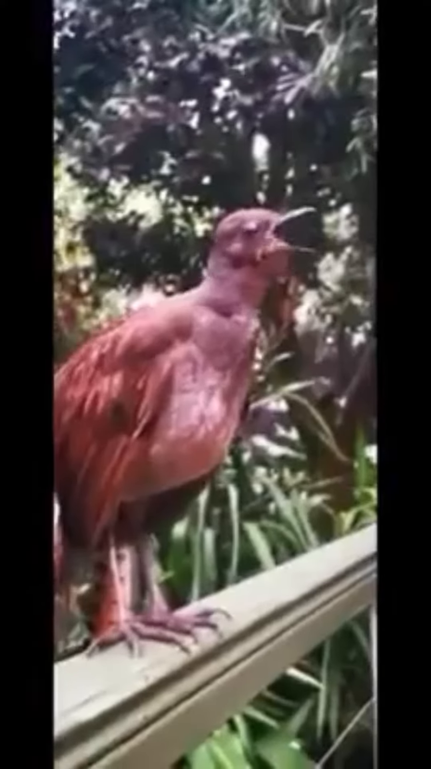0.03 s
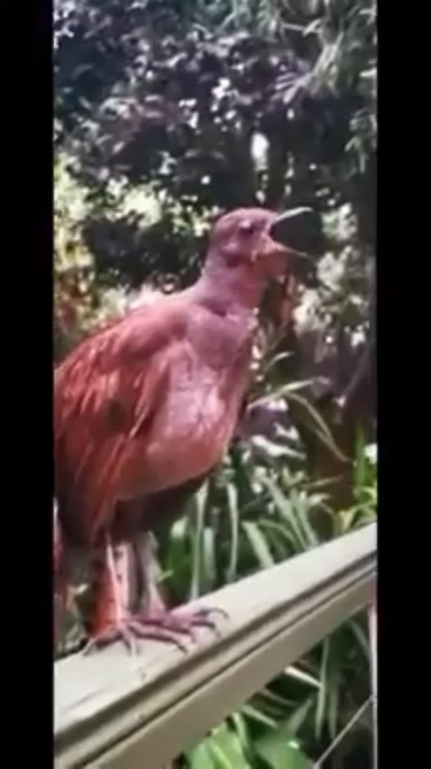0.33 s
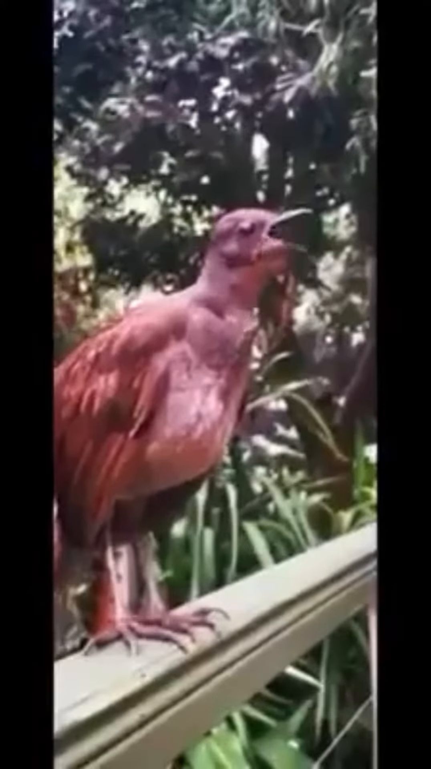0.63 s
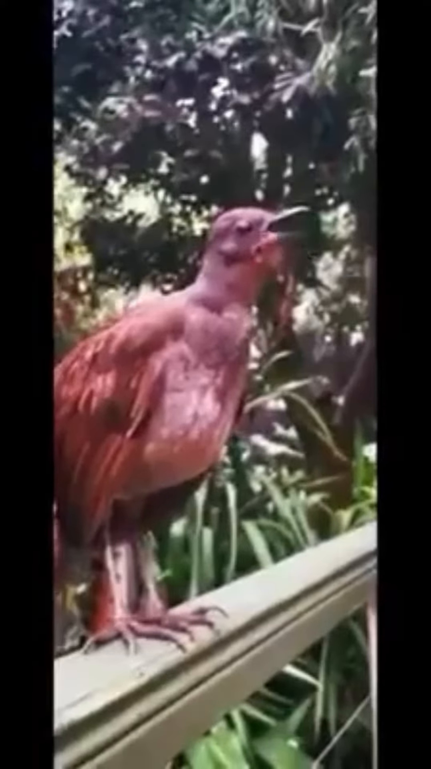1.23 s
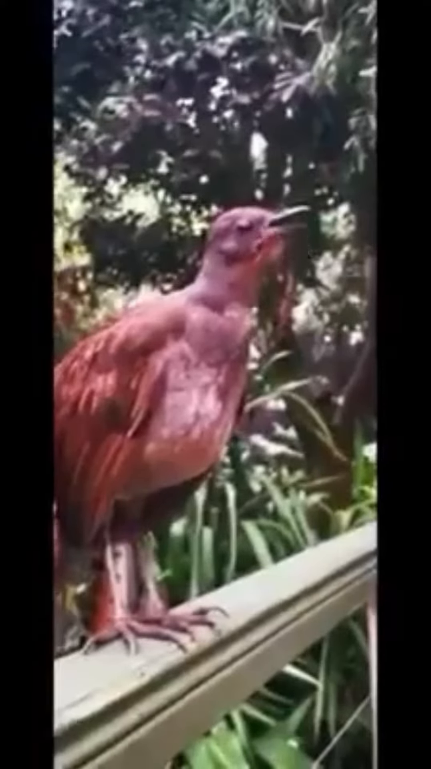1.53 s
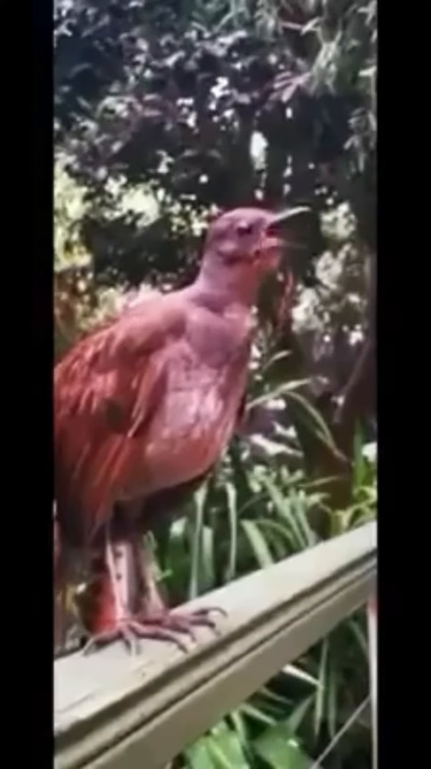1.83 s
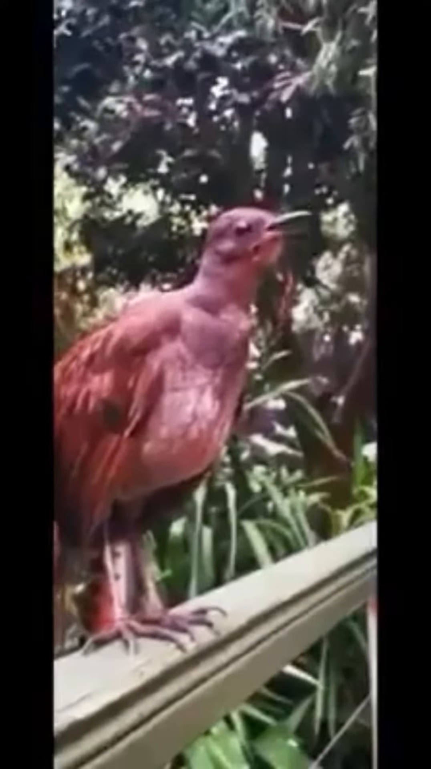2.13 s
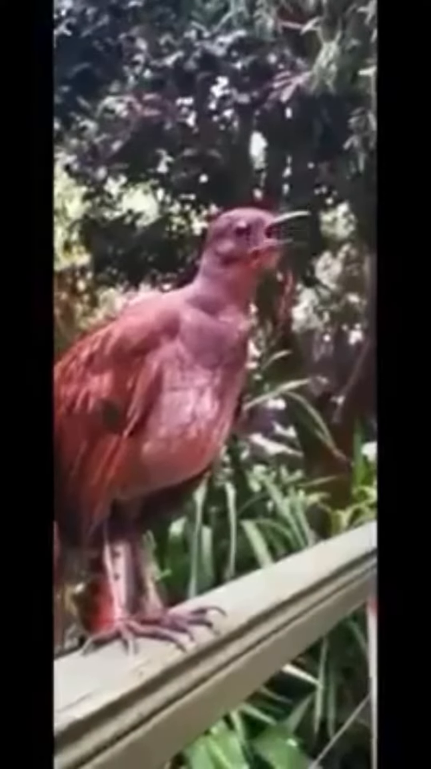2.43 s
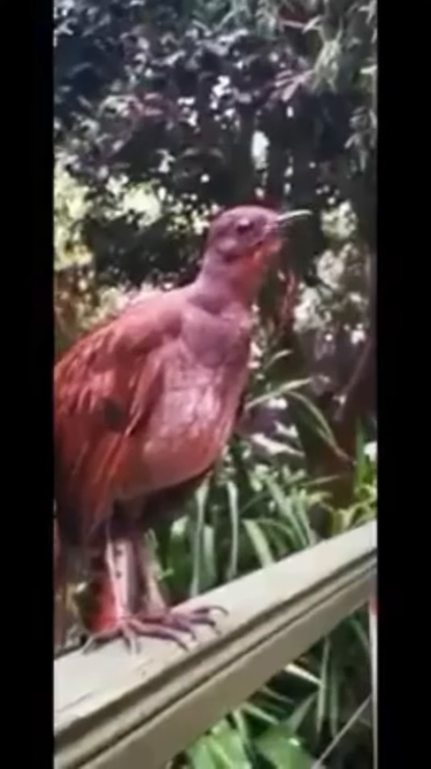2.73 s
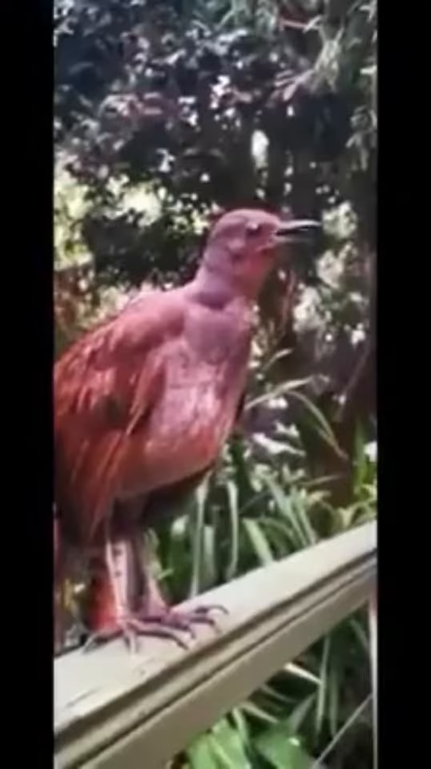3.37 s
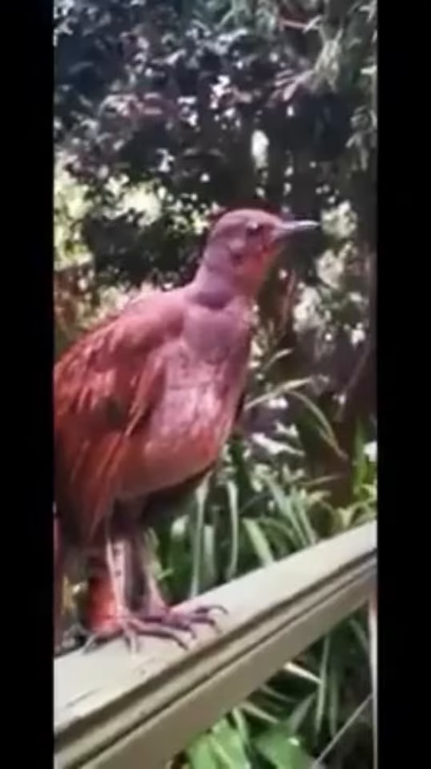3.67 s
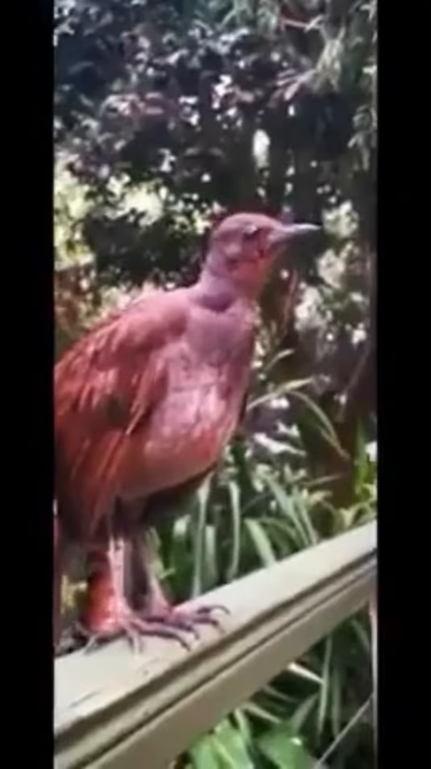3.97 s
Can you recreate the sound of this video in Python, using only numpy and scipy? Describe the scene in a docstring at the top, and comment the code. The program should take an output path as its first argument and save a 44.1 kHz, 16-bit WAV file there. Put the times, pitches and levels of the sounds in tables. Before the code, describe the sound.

A large bird close to a dull microphone gives quick, harsh cackles with small hoots and soft notes between them. From about 1.4 to 2.6 seconds it slows into seven thin whines, each breaking down into a rough squawk. From 2.8 to 3.5 seconds come short yelps, bill clicks and hisses, with one faint hiss near 4 seconds. A low garden rumble and slight echo continue throughout.

```python
"""A garden, one dull microphone close to a large bird on a railing; low rumble and a faint echo throughout.
The bird opens with harsh arched cackles sung with both sides of the syrinx, hoots and soft notes between.
From 1.4 s it slows into thin whines that break downward into rough squawks.
From 2.8 s come short yelps, bill clicks and hisses of air; one faint hiss closes the scene near 4 s.
At this distance the loudest notes overload the microphone slightly."""
import sys
import numpy as np
from scipy import signal
from scipy.fft import rfft, irfft, next_fast_len
from scipy.io import wavfile
from scipy.ndimage import uniform_filter1d, map_coordinates

SR = 44100
rng = np.random.default_rng(int(sys.argv[2]) if len(sys.argv) > 2 else 0)


def dump_mix(stems):
    """Bounce the given channels to the path in sys.argv[1] as a 16-bit WAV at rate SR."""
    frames = np.atleast_2d(stems).T  # one column per channel
    limited = np.clip(frames, -1, 1)  # hard clip at full scale
    pcm = np.round(limited * 32767).astype(np.int16)
    wavfile.write(sys.argv[1], SR, pcm)


N = 176400   # 4 s


def from_db(db):
    """Decibels to gain."""
    return 10 ** (np.asarray(db) / 20)


def unit_rms(x):
    """Scale to unit power."""
    return x / np.sqrt(np.mean(x ** 2) + 1e-20)


def clock(length_s):
    """Sample times of one note."""
    return np.arange(max(int(length_s * SR), 64)) / SR


def add(out, start_s, x):
    """Mix a sound in at its start time."""
    i = int(start_s * SR)
    x = x[max(-i, 0):max(N - i, 0)]
    out[max(i, 0):max(i, 0) + len(x)] += x


def coloured(x, colour):
    """Filter by a curve through (frequency_hz, gain_db) points."""
    size = next_fast_len(len(x) + 2048)
    hz, db = np.transpose(colour)
    bin_hz = np.maximum(np.arange(size // 2 + 1) * SR / size, 1)
    gain = from_db(np.interp(np.log(bin_hz), np.log(hz), db))
    return irfft(rfft(x, size) * gain, size)[:len(x)]


def wobble(t, rate_hz):
    """Smooth random drift of unit power."""
    pole = np.exp(-2 * np.pi * rate_hz / SR)
    noise = rng.standard_normal(len(t) + SR // 10)
    return unit_rms(signal.lfilter([1], [1, -2 * pole, pole * pole], noise)[SR // 10:])


def swell(t, attack_s, release_s):
    """Rounded attack, hold and release."""
    rise = np.sin(np.pi / 2 * np.clip(t / attack_s, 0, 1)) ** 2
    fall = np.sin(np.pi / 2 * np.clip((t[-1] - t) / release_s, 0, 1)) ** 2
    return rise * fall


def glide(t, start_hz, middle_hz, end_hz):
    """A smooth bend through three pitches."""
    return np.polyval(np.polyfit([0, .5, 1], [start_hz, middle_hz, end_hz], 2), t / t[-1])


def voice(t, pitch, colour, jitter, shimmer=.2, unsteady_hz=260, levelling=.7):
    """Unsteady syrinx pulses through the throat, their level partly evened."""
    phase = 2 * np.pi * np.cumsum(pitch * (1 + jitter * wobble(t, unsteady_hz))) / SR
    pulses = sum(np.cos(k * phase + 2 * np.pi * rng.random()) for k in range(1, 17))
    tone = unit_rms(coloured(pulses * (1 + shimmer * wobble(t, unsteady_hz)), colour))
    power = uniform_filter1d(tone * tone, size=256) + 1e-4
    return unit_rms(tone / power ** (levelling / 2))


def rasp(t, pitch, colour, chop=.6, flutter=.15, flutter_hz=170):
    """Chaotic rattle of the syrinx: air chopped each cycle, at a nearly even level."""
    gate = 1 + chop * np.cos(2 * np.pi * np.cumsum(pitch) / SR)
    gate *= np.exp(flutter * wobble(t, flutter_hz))
    return unit_rms(coloured(gate * rng.standard_normal(len(t)), colour))


# Spectrum of the garden behind the bird: frequency_hz, gain_db
GARDEN_COLOUR = [(20, 1.5), (36, -0.5), (70, -1.5), (150, -10), (320, -15.5), (600, -21), (1700, -28),
                 (3000, -33), (6500, -36.5), (9500, -49.5), (13000, -65)]
# Slow rise and fall of its rumble: time_s, relative_level_db
GARDEN_SWELL = [(0.0, -47.5), (0.27, -47.5), (2.9, -42), (3.39, -47), (4.0, -41)]


def garden(gain_db=5):
    """Low outdoor rumble all around the microphone, swelling a little, with a faint hiss above it."""
    level_db = gain_db + np.interp(np.arange(N) / SR, *np.transpose(GARDEN_SWELL))
    return from_db(level_db) * unit_rms(coloured(rng.standard_normal(N), GARDEN_COLOUR))


# Tone of the scatter that the garden sends back to the microphone: frequency_hz, gain_db
SCATTER_COLOUR = [(300, -13), (1000, 4), (1700, -4.5), (2600, 0.5), (4500, 10.5), (7000, 9.5), (10000, 3.5)]


def echoes(bird, ring_hz=1722, ring_t60_s=.3, ring_db=-15):
    """Quick scatter from near the railing, a longer wash from the foliage and one faint lingering ring."""
    t, scatter = clock(.39), 0
    onset = np.minimum(t / .0014, 1)
    for gain_db, t60_s in ((-19, .38), (-13, .19)):   # foliage, nearby scatter
        tail = rng.standard_normal(len(t)) * np.exp(-np.log(1000) * t / t60_s) * onset
        scatter = scatter + from_db(gain_db) * tail / np.linalg.norm(tail)
    fade = np.exp(-np.log(1000) * t / ring_t60_s)
    ring = from_db(ring_db) * 2 * fade / fade.sum() * np.sin(2 * np.pi * ring_hz * t)
    return signal.fftconvolve(bird, coloured(scatter, SCATTER_COLOUR) + ring)[:N]


# Ticks of the bill: start_s, level_db
BILL_CLICKS = [(2.928, -14), (2.936, -23), (2.982, -19), (3.304, -29), (3.377, -21), (3.391, -22),
               (3.433, -27), (3.442, -21)]
# Spectrum of one tick: frequency_hz, gain_db
BILL_COLOUR = [(250, -25), (700, -3.5), (1300, -6), (2200, -11), (3400, -15.5), (4500, -17.5), (9000, -36)]


def bill_clicks(decay_s=.0028):
    """Dry ticks of the bill at close range, each a burst of noise that dies at once."""
    out, t = np.zeros(N), clock(10 * decay_s)
    for start_s, level_db in BILL_CLICKS:
        burst = unit_rms(coloured(rng.standard_normal(len(t)), BILL_COLOUR))
        add(out, start_s, from_db(level_db) * burst * np.exp(-t / decay_s))
    return out


# Hisses and the glide of their whistle: start_s, length_s, air_db, whistle_db, start_hz, middle_hz, end_hz
BILL_HISSES = [(2.899, 0.11, -33.5, -34, 5060, 6330, 7120), (3.004, 0.087, -19.5, -23.5, 4500, 4680, 3670),
               (3.023, 0.076, -27.5, -20.5, 7030, 6715, 5770), (3.052, .08, -33.5, -20, 3200, 1900, 2620),
               (3.075, 0.071, -20, -19.5, 3500, 4400, 5490), (3.173, 0.097, -21, -26.5, 6810, 7000, 6200),
               (3.443, 0.077, -17, -20.5, 5360, 4510, 4120), (3.942, 0.093, -32, -34, 4200, 6120, 6920)]
# Spectrum of the rushing air: frequency_hz, gain_db
AIR_COLOUR = [(300, -41), (1200, -14), (2000, -1), (3000, -1.5), (4500, -4), (5500, -3.5), (7000, -1),
              (9500, -14.5), (13000, -46)]


def hisses(whistle_width_hz=150):
    """Air forced through the bill, with a hoarse gliding whistle in it."""
    out = np.zeros(N)
    for start_s, length_s, air_db, whistle_db, start_hz, middle_hz, end_hz in BILL_HISSES:
        t = clock(length_s)
        phase = 2 * np.pi * np.cumsum(glide(t, start_hz, middle_hz, end_hz)) / SR
        whistle = wobble(t, whistle_width_hz) * np.cos(phase)
        whistle += wobble(t, whistle_width_hz) * np.sin(phase)
        air = unit_rms(coloured(rng.standard_normal(len(t)), AIR_COLOUR))
        hiss = from_db(air_db) * air + from_db(whistle_db) * whistle
        add(out, start_s, hiss * swell(t, attack_s=.023, release_s=.036))
    return out


# Hollow hoots among the cackles: start_s, length_s, level_db, top_hz, rasp_db
HOOT_NOTES = [(0.591, 0.044, -16.5, 575.6, -24.5), (0.639, 0.027, -33.5, 521, -14.5)]
# Throat resonances in a hoot: frequency_hz, gain_db
HOOT_THROAT = [(300, -49), (560, -10.5), (850, -11.5), (1120, 2), (1600, -9), (2000, -28.5), (4000, -25.5),
               (9000, -37)]


def hoots(sag_hz=119):
    """Low arched notes with the throat tuned to their second harmonic."""
    out = np.zeros(N)
    for start_s, length_s, level_db, top_hz, rasp_db in HOOT_NOTES:
        t = clock(length_s)
        pitch = top_hz - sag_hz * (2 * t / t[-1] - 1) ** 2
        tone = from_db(level_db) * voice(t, pitch, HOOT_THROAT, jitter=.0051, shimmer=.08)
        air = from_db(rasp_db) * rasp(t, pitch, HOOT_THROAT)
        add(out, start_s, (tone + air) * swell(t, attack_s=.01, release_s=.01))
    return out


# Throat resonances in yelps, squawks and cackles: frequency_hz, gain_db
THROAT_COLOUR = [(300, -17), (560, -22.5), (780, -7.5), (1080, -12.5), (1300, -16.5), (1550, 10),
                 (1900, 9.5), (2150, 5), (2400, -4), (3200, -21.5), (3900, -14.5), (5000, -32),
                 (6900, -37.5), (9500, -34.5), (13000, -49.5)]
# Spectrum of the rasp in the same calls: frequency_hz, gain_db
RASP_COLOUR = [(250, -53.5), (450, -24.5), (600, -11.5), (1000, -14), (1400, -0.5), (1800, 0), (2400, 0.5),
               (3300, -9), (4100, -8.5), (5000, -23), (6000, -19.5), (7000, -14.5), (9500, -34.5),
               (13000, -70.5)]
# Soft notes among the cackles, then the closing yelps:
# start_s, length_s, level_db, start_hz, middle_hz, end_hz, throat_hz, rasp_db
YELP_NOTES = [(0.725, 0.067, -26, 751, 762, 710, 1810, -22), (0.84, 0.059, -31, 656, 693, 660, 1710, -22.5),
              (.95, 0.089, -35, 657, 694, 610, 1690, -23), (2.859, 0.029, -12.5, 587, 480, 333, 1480, -32),
              (2.997, 0.033, -12, 368.5, 602, 681, 1906, -17),
              (3.166, 0.038, -15.5, 407, 556.3, 665, 1800, -17),
              (3.324, 0.048, -4, 469, 639.3, 382, 1683, -20.5),
              (3.444, .025, -18, 428, 553, 805, 2050, -12.5)]


def yelps(base_throat_hz=1720, throat_follows=.75):
    """Quick glides of one voice, the throat resonance sliding along with the pitch."""
    out = np.zeros(N)
    for start_s, length_s, level_db, start_hz, middle_hz, end_hz, throat_hz, rasp_db in YELP_NOTES:
        t = clock(length_s)
        pitch = glide(t, start_hz, middle_hz, end_hz)
        throat = np.array(THROAT_COLOUR) * [throat_hz / base_throat_hz, 1]
        speed = (pitch / pitch.mean()) ** throat_follows
        speed /= speed.mean()
        tone = from_db(level_db) * voice(t, pitch / speed, throat, jitter=.016)
        air = from_db(rasp_db) * rasp(t, pitch / speed, RASP_COLOUR)
        # Reading at a changing speed bends pitch and resonances together.
        yelp = map_coordinates(tone + air, [np.cumsum(speed)], order=3)
        add(out, start_s, yelp * swell(t, attack_s=.33 * length_s, release_s=.33 * length_s))
    return out


# Whines that break into squawks:
# start_s, whine_s, squawk_s, whine_hz, squawk_hz, whine_db, squawk_db, rasp_db
SQUAWK_NOTES = [(1.399, .07, 0.064, 965, 701.4, -12.5, -10, -15),
                (1.597, 0.05, .058, 990, 625, -15, -6.5, -13.5),
                (1.765, 0.058, 0.064, 965, 629, -15, -6, -10.5),
                (1.947, 0.06, 0.061, 965, 571, -13.5, -8.5, -12.5),
                (2.131, .062, 0.063, 955, 585, -15, -6, -11),
                (2.321, 0.073, 0.06, 985, 590.6, -14.5, -7, -12),
                (2.54, 0.038, 0.066, 1000, 538, -18.5, -10.5, -38)]
# Throat resonances in a whine: frequency_hz, gain_db
WHINE_THROAT = [(300, -28.5), (600, -4), (1000, -10), (1400, -4.5), (1900, 2), (2900, -19), (3900, -21),
                (5000, -31), (6900, -28.5), (9500, -46), (13000, -60.5)]


def squawks(break_s=.03, lead_s=.01, scoop_hz=148.5, scoop_s=.012, rise_hz=43, sag_db=-3.5):
    """A thin, nearly level whine; then the pitch drops and the note turns loud and rough."""
    out = np.zeros(N)
    for start_s, whine_s, squawk_s, whine_hz, squawk_hz, whine_db, squawk_db, rasp_db in SQUAWK_NOTES:
        t = clock(whine_s + squawk_s)
        since_break = t - whine_s
        pitch = np.interp(since_break, [0, break_s, (break_s + squawk_s) / 2, squawk_s],
                          [whine_hz, squawk_hz, squawk_hz * .97, squawk_hz * .84])
        pitch += scoop_hz * np.exp(-t / scoop_s)   # the whine slides in from above
        pitch += rise_hz * (t / whine_s - .5) * (since_break < 0)
        pitch *= 1 + .015 * wobble(t, rate_hz=50)
        flutter_db = wobble(t, rate_hz=60)
        fade_db = sag_db * np.minimum(t / whine_s, 1) ** 4   # it sags just before it breaks
        whine_gain = from_db(whine_db + flutter_db + fade_db) * swell(t, .028, release_s=squawk_s)
        # The effort rises just before the pitch drops.
        squawk_gain = from_db(squawk_db) * swell(since_break + lead_s, .031 + lead_s, release_s=.021)
        rasp_gain = from_db(rasp_db) * swell(since_break, attack_s=.028, release_s=.021)
        rasp_gain += whine_gain * from_db(-11.5)   # a little rasp in the whine too
        whine = whine_gain * voice(t, pitch, WHINE_THROAT, jitter=.028)
        squawk = squawk_gain * voice(t, pitch, THROAT_COLOUR, jitter=.0228)
        add(out, start_s, whine + squawk + rasp_gain * rasp(t, pitch, RASP_COLOUR))
    return out


# The opening run of two-voiced cackles, close to the microphone:
# start_s, length_s, low_db, low_top_hz, high_db, high_top_hz, high_centre_fraction, rasp_db
CACKLE_NOTES = [(-.025, 0.096, -15, 698.7, -4, 774.6, .5, -9.5),
                (0.113, .089, -10.5, 657.4, -8.5, 774.4, .42, -9.5),
                (0.241, 0.083, -11, 671, -11, 767, .44, -10),
                (0.368, 0.086, -9.5, 620, -13, 729.5, .44, -11),
                (0.503, 0.084, -12.5, 692.4, -20, 775, 0.6, -11.5),
                (0.639, 0.092, -15.5, 650.5, -9, 759, .44, -11),
                (0.77, 0.073, -8, 695, -28.5, 740, 0.6, -12), (0.883, .067, -9, 707.4, -32, 685, .5, -13.5),
                (0.995, 0.077, -6.5, 713, -9.5, 786, .45, -13),
                (1.118, 0.072, -9.5, 695, -8, 769.6, .4, -15.5),
                (1.257, 0.08, -10.5, 694.4, -11, 773.5, .27, -15.5)]


def cackles(edge_hz=525, high_sag_hz=168, high_width=.16, duck_db=-10.5, rasp_growth_db=4.5):
    """One side of the syrinx arches low; the higher side takes over briefly; rasp grows toward the end."""
    out = np.zeros(N)
    for start_s, length_s, low_db, low_top_hz, high_db, high_top_hz, centre, rasp_db in CACKLE_NOTES:
        t = clock(length_s)
        progress = t / t[-1]
        low_pitch = edge_hz + (low_top_hz - edge_hz) * np.abs(np.sin(np.pi * progress)) ** 1.5
        low_pitch *= 1 + .01266 * wobble(t, rate_hz=38.7)
        high_pitch = high_top_hz - high_sag_hz * (progress - centre) ** 2
        high_opening = np.exp(-((progress - centre) / high_width) ** 4 / 2)
        # The high voice pushes the low one and the rasp aside.
        takeover = high_opening * min(from_db(high_db - low_db), 1)
        low = from_db(low_db + duck_db * takeover) * voice(t, low_pitch, THROAT_COLOUR, jitter=.022)
        high = from_db(high_db) * high_opening * voice(t, high_pitch, THROAT_COLOUR, jitter=.012)
        voices = (low + high) * swell(t, attack_s=.013, release_s=.019)
        rasp_gain = from_db(rasp_db + rasp_growth_db * (progress - .5)) * (1 - .28 * takeover)
        rasp_gain *= swell(t, attack_s=.017, release_s=.019)
        add(out, start_s, voices + rasp_gain * rasp(t, low_pitch, RASP_COLOUR))
    return out


def scene():
    """What reaches the microphone: the bird close by, its echo and the garden behind, in mono."""
    bird = cackles() + squawks() + yelps() + hoots() + hisses() + bill_clicks()
    return (bird + echoes(bird) + garden())[None]


# Response of the microphone, notched and dull in the treble: frequency_hz, gain_db
MICROPHONE_RESPONSE = [(7100, -2), (7400, -19), (7800, -30), (8600, -20), (9200, 0), (10100, -10),
                       (10700, -23.5), (15000, -24.5)]


def record(dry, cutoff_hz=15600):
    """A dull microphone, near enough that the highest peaks flatten at full scale; the top is cut."""
    dulled = coloured(dry[0], MICROPHONE_RESPONSE)
    flattened = dulled / (1 + dulled ** 12) ** (1 / 12)
    lowpass = signal.cheby2(12, 70, cutoff_hz, fs=SR, output="sos")
    return signal.sosfilt(lowpass, flattened)[None]


dry = scene()
out = record(dry)
dump_mix(out)
```